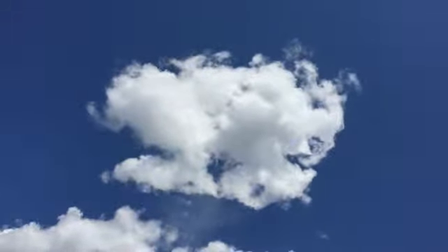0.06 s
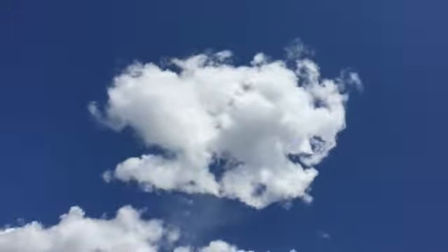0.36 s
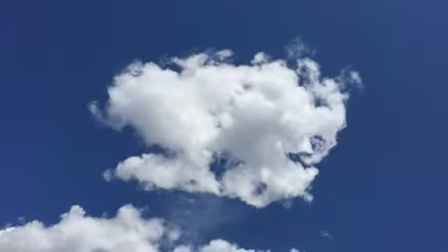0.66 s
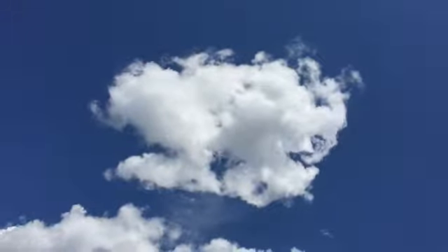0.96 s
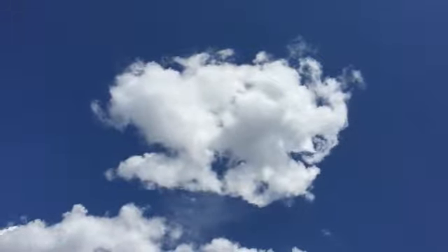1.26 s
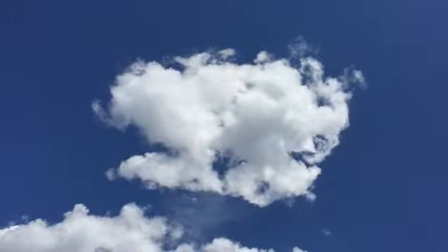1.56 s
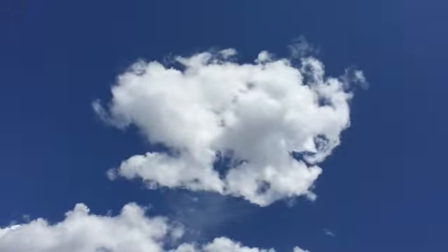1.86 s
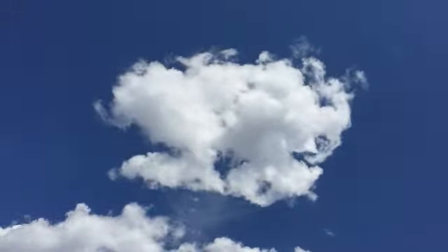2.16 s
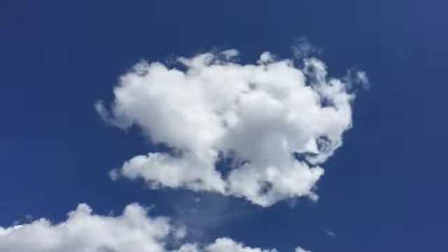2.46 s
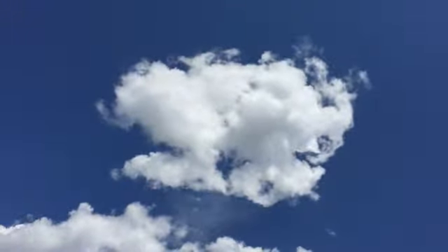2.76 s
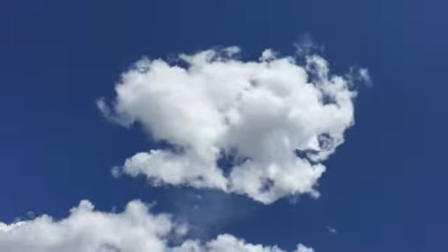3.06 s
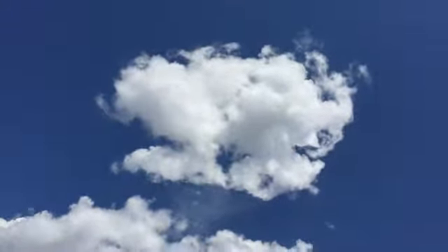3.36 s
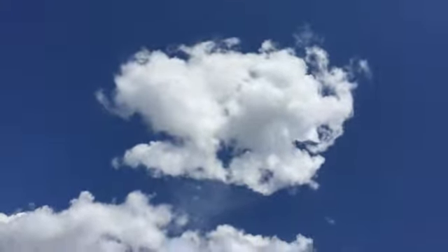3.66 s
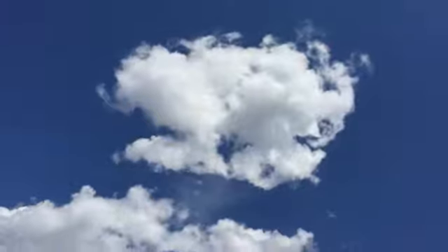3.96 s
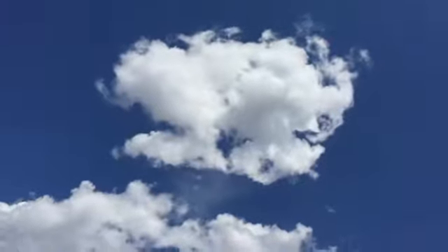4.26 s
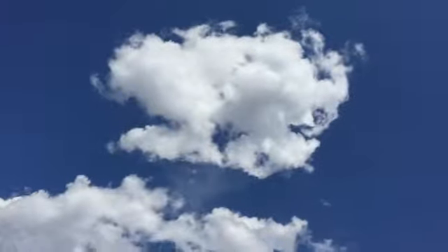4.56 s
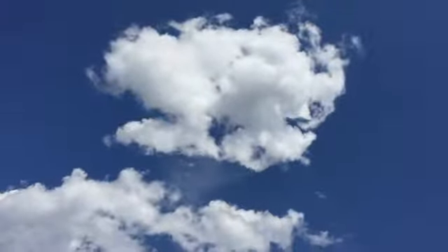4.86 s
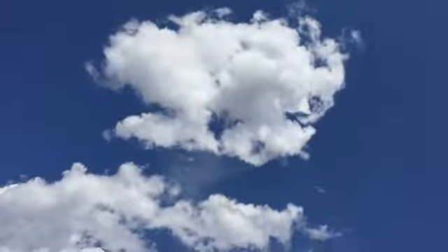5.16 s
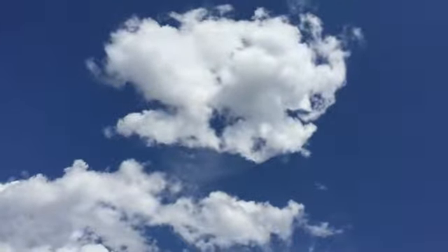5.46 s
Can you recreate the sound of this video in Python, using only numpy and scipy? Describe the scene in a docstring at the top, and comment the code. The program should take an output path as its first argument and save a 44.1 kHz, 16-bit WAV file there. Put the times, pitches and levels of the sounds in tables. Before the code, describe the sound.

A small bird gives short, sharp high chips outdoors while gusts of wind thump and rumble on the microphone.

```python
"""Outdoors in gusty wind, a flycatcher gives sharp chips, with quick echoes off surfaces nearby.
Each chip is a fast downward sweep from one side of its syrinx, joined briefly by the other side.
Eddies thump and rumble on the microphone over a few far-off pips and a faint hush of air.
One microphone feeds both channels; the right one passes a noise gate that only the fuller chips open."""
import sys
import numpy as np
from scipy import signal
from scipy.fft import rfft, irfft
from scipy.io import wavfile
from scipy.ndimage import uniform_filter1d, minimum_filter1d

SR = 44100
rng = np.random.default_rng(int(sys.argv[2]) if len(sys.argv) > 2 else 0)


def unload_wav(signal):
    """Save mono or channel-first audio to the path in sys.argv[1] as 16-bit WAV at rate SR, clipped to [-1, 1]."""
    wavfile.write(
        sys.argv[1],
        SR,
        np.round(np.clip(np.atleast_2d(signal).T, -1, 1) * 32767).astype(np.int16),
    )


N = 251811


def chip(start_hz, held_hz, end_hz, sweep_s, level_db, second_db):
    """One side of the syrinx dives, cresting at the held pitch; the other briefly holds that note."""
    dive_s, fade_s, release_s, swell = .015, .0037, .0016, 2.11
    second_lag_s, second_length_s = .0035, .0074
    t = np.arange(int(2 * dive_s * SR)) / SR
    hz = end_hz + (start_hz - end_hz) * np.exp(-(t / sweep_s) ** 2)
    crest_s = np.interp(-held_hz, -hz, t)
    octave_db = -22 + 26 * np.log2(start_hz / 8400)  # a tenser syrinx starts higher and sounds brighter
    attack = np.exp(-(swell * (1 - t / crest_s)) ** 2)
    pressure = np.where(t < crest_s, attack, np.exp(-(t - crest_s) / fade_s))
    pressure *= np.clip((dive_s - t) / release_s, 0, 1)
    second_swell = arch(t - crest_s - second_lag_s + second_length_s / 2, second_length_s)
    second_voice = second_swell * whistle(np.full(len(t), held_hz), octave_db)
    return undb(level_db) * (pressure * whistle(hz, octave_db) + undb(second_db) * second_voice)


def whistle(hz, octave_db, clash_hz=6000):
    """A nearly pure tone; slack membranes clash more, so the octave grows as the pitch falls."""
    phase = 2 * np.pi * np.cumsum(hz) / SR
    return np.sin(phase) + undb(octave_db) * (clash_hz / hz) ** 2 * np.sin(2 * phase)


# The bird's cues: start_s, start_hz, held_hz, end_hz, sweep_s, level_db, second_voice_db, perch_delay_s
CHIPS = [(0.234, 9720, 7510, 4970, 0.0084, -31.5, 4.5, .00048),
         (0.788, 9560, 6700, 3700, .011, -27.5, -11, .00195),
         (1.3411, 8820, 6000, 2647, 0.0076, -27, -20, .00062),
         (1.8582, 8234, 5880, 2183, 0.0078, -27, -13, .00044),
         (2.5, 7690, 5720, 1870, .007, -27.5, -10.5, .00056),
         (3.1351, 7800, 6070, 2370, .0067, -31.5, -15, .000324),
         (4.2533, 7890, 6100, 2160, .0069, -28.5, -12.5, .00152),
         (4.766, 8300, 5410, 2385, 0.0067, -30, -13.5, .00034),
         (5.1233, 8400, 5900, 2376, 0.0086, -32.5, -6.5, .00034)]
# Peaks and dips the voice takes on along its way: frequency_hz, gain_db
VOICE_EQ = [(2000, -3), (2600, 2), (2850, -2), (3200, 5), (3750, -8.5), (4400, 6), (4950, -6), (5500, 3.5),
            (6000, 0), (6950, 1.5), (8000, 0), (9200, 3), (14000, -2)]


def flycatcher(perch_db=-8.5, rasp_db=-22, rasp_hz=7000):
    """Chips, each with a tight echo off the perch and a bright rasp that follows its loudness."""
    chips = np.zeros(N)
    for start_s, *voice, perch_delay_s in CHIPS:
        sound = chip(*voice)
        add(chips, start_s, sound)
        add(chips, start_s + perch_delay_s, undb(perch_db) * sound)  # this path changes as the head turns
    high_pass = signal.butter(2, rasp_hz, "high", fs=SR, output="sos")
    rasp = signal.sosfilt(high_pass, np.abs(chips) * rng.standard_normal(N))
    return colour(chips + undb(rasp_db) * rasp, VOICE_EQ)


# Early reflections off surfaces near the bird: delay_s, level_db
ECHOES = [(0.00116, -22.5), (0.00127, -18), (0.00188, -18), (0.00317, -16.5), (0.00603, -14)]
# Tone of the scattered echo: frequency_hz, gain_db
SCATTER_EQ = [(2000, -2), (3200, -1), (4800, -2), (6200, 1.5), (8000, -0.5), (12000, 6)]


def surroundings(x, near_t60_s=.08, tail_t60_s=.19, late_s=.025, late_length_s=.028):
    """The direct sound plus distinct echoes, dense close scatter, a thin tail and a farther cluster."""
    t = np.arange(SR // 4) / SR
    clouds = [(-15, undb(-60 * t / near_t60_s)),  # level_db, envelope
              (-25, undb(-60 * t / tail_t60_s)),
              (-30, arch(t - late_s, late_length_s))]
    scatter = sum(undb(db) * env / np.linalg.norm(env) * rng.standard_normal(len(t)) for db, env in clouds)
    response = np.zeros(len(t))
    add(response, .002, scatter)
    echoes = sum(undb(db) * np.roll(x, int(round(delay_s * SR))) for delay_s, db in ECHOES)
    diffuse = signal.fftconvolve(x, response)[:N]
    return x + echoes + colour(diffuse, SCATTER_EQ)


# Strong eddies hitting the microphone: peak_s, level_db, length_s
BUFFETS = [(0.116, -43.5, 0.049), (0.186, -45, 0.055), (0.347, -43, 0.019), (0.456, -45.5, 0.075),
           (0.658, -43, .025), (0.943, -44.5, 0.08), (1.204, -43.5, .12), (1.989, -41, 0.11),
           (2.135, -39.5, 0.045), (2.483, -43.5, 0.053), (2.552, -32.5, 0.049), (3.29, -46, 0.048),
           (3.706, -45, 0.044), (3.969, -42, 0.053), (4.049, -31, 0.071), (4.278, -40, 0.054),
           (4.393, -45, .029), (4.505, -41.5, 0.071), (4.614, -42.5, 0.036), (4.765, -42.5, 0.029),
           (5.02, -33, 0.085), (5.17, -45.5, 0.041), (5.401, -47.5, .051), (5.679, -36, 0.044)]


def wind(low_cut_hz=45, fine_hz=130, rolloff_db=8, steepness=1.45, skirt_db=-20, trim_db=-1):
    """Each eddy is a brief burst of turbulent pressure; faster ones reach higher in pitch."""
    out, size = np.zeros(N), SR // 2
    t = np.arange(size) / SR - size / SR / 2
    f = np.fft.rfftfreq(size, 1 / SR)
    low_cut = (f / low_cut_hz) ** 6 / np.sqrt(1 + (f / low_cut_hz) ** 12)
    fine_share = f ** 4 / (f ** 4 + fine_hz ** 4)
    for peak_s, level_db, length_s in BUFFETS + flutter():
        corner_hz = 78 * 2 ** ((level_db + 44) / 22)  # opens an octave for every 22 dB
        rolloff = undb(-rolloff_db * (f / corner_hz) ** steepness)
        thump = np.exp(-(t / (.52 * length_s)) ** 2)
        swell = thump + undb(skirt_db) * np.exp(-np.abs(t) / length_s)
        core = thump ** 2.2  # fine turbulence lives only in the core of the eddy
        noise = rng.standard_normal(size)
        spectrum = (1 - fine_share) * rfft(swell * noise) + fine_share * rfft(core * noise)
        eddy = irfft(spectrum * low_cut * rolloff, size)
        eddy *= np.sqrt(length_s * SR / np.sum(eddy ** 2))
        add(out, peak_s + t[0], undb(level_db + trim_db) * eddy)
    return out


# Level curve under the light rumble between buffets: time_s, level_db
BREEZE = [(0.0, -60), (0.84, -71.5), (1.14, -54.5), (1.37, -68), (3.61, -74), (4.13, -57), (4.8, -67.5),
          (5.09, -61), (5.34, -76), (5.71, -74.5)]


def flutter(eddies_per_s=7, length_s=.04, lift_db=12, scatter_db=3):
    """Loosely spaced small eddies riding on the breeze, as rows of peak_s, level_db, length_s."""
    count = int(eddies_per_s * N / SR)
    times = (np.arange(count) + rng.random(count)) / eddies_per_s
    levels = np.interp(times, *np.transpose(BREEZE)) + lift_db + scatter_db * rng.standard_normal(count)
    return [(peak_s, level_db, length_s) for peak_s, level_db in zip(times, levels)]


# Far-off pips and one soft swell: start_s, pitch_hz, length_s, level_db
FAR_NOTES = [(0.090, 3020, 0.053, -76), (0.90, 1019, .61, -79), (2.175, 2006, .022, -66),
             (3.505, 1032, 0.033, -70), (4.366, 2530, 0.03, -70), (4.819, 1002, 0.027, -68),
             (5.414, 1566, 0.035, -70.5), (5.463, 4350, 0.027, -72.5)]


def far_notes(blur=.12):
    """Faint notes whose pitch is blurred by distance."""
    out, t = np.zeros(N), np.arange(N) / SR
    for start_s, pitch_hz, length_s, level_db in FAR_NOTES:
        wavering_hz = pitch_hz * (1 + blur / 2 * drift(2 * blur * pitch_hz))
        tone = np.sqrt(2) * np.sin(2 * np.pi * np.cumsum(wavering_hz) / SR)
        out += undb(level_db) * arch(t - start_s, length_s) * tone
    return out


# Tone of the outdoor air bed: frequency_hz, gain_db
HUSH_EQ = [(20, -14), (45, 7.5), (75, 7.5), (130, -4.5), (250, -9), (400, -10.5), (700, -14), (1100, -16.5),
           (1600, -18.5), (3500, -21.5), (5000, -25), (6500, -25), (10500, -29), (15000, -30.5)]


def hush(level_db=-65, sway_db=.91, sway_hz=1.8):
    """Distant air, swaying a little in level."""
    air = colour(rng.standard_normal(N), HUSH_EQ)
    return air / air.std() * undb(level_db + sway_db * drift(sway_hz))


def gate(x, threshold_db=-58, lookahead_s=.038, hold_s=.059, ramp_s=.0065):
    """A look-ahead noise gate that listens around 3 kHz and holds open briefly."""
    key = signal.sosfiltfilt(signal.butter(6, [2300, 3400], "band", fs=SR, output="sos"), x)
    loud = uniform_filter1d(key ** 2, SR // 250) > undb(threshold_db) ** 2
    held = 1 - minimum_filter1d(1. - loud, int((lookahead_s + hold_s) * SR))
    held = np.roll(held, int((hold_s - lookahead_s) / 2 * SR))
    ramped = uniform_filter1d(held, int(ramp_s * SR))
    return x * uniform_filter1d(ramped, int(ramp_s * SR / 2))


def undb(db):
    """Decibels to gain."""
    return 10 ** (np.asarray(db) / 20)


def add(track, start_s, sound):
    """Mix a sound into a track at its cue."""
    i = int(round(start_s * SR))
    a, b = max(i, 0), min(i + len(sound), len(track))
    track[a:b] += sound[a - i:b - i]


def colour(x, points):
    """EQ through points of frequency_hz, gain_db."""
    hz, db = np.transpose(points)
    f = np.maximum(np.fft.rfftfreq(len(x), 1 / SR), 1)
    return irfft(rfft(x) * undb(np.interp(np.log(f), np.log(hz), db)), len(x))


def drift(rate_hz):
    """Smooth random motion with a spread of 1."""
    k = int(SR / rate_hz)
    steps = np.repeat(rng.standard_normal(N // k + 1), k)
    smooth = uniform_filter1d(uniform_filter1d(steps, k), k)[:N]
    return smooth / smooth.std()


def arch(t, length_s):
    """A smooth swell from 0 to 1 and back."""
    return np.sin(np.pi * np.clip(t / length_s, 0, 1)) ** 2


def scene():
    """Bird, wind and background reach one microphone, wired to both channels."""
    mic = surroundings(flycatcher()) + far_notes() + wind() + hush()
    return np.array([mic, mic])


def record(dry):
    """The right channel is gated; the top is cut on both."""
    channels = np.array([dry[0], gate(dry[1])])
    high_cut = signal.ellip(10, .1, 80, 15700, fs=SR, output="sos")
    return signal.sosfilt(high_cut, channels)


dry = scene()
out = record(dry)
unload_wav(out)
```